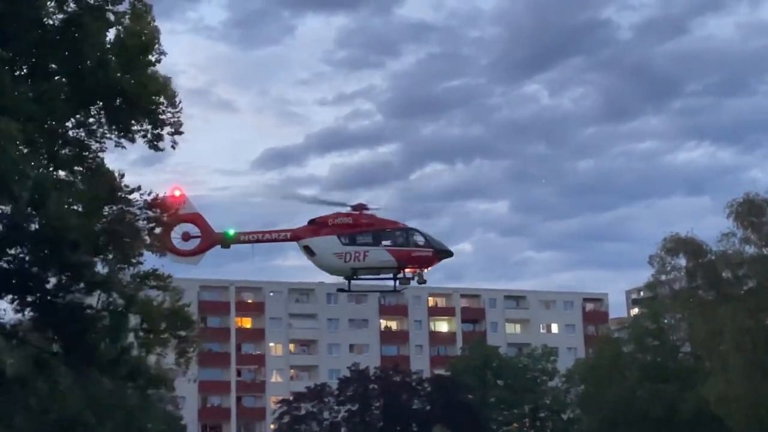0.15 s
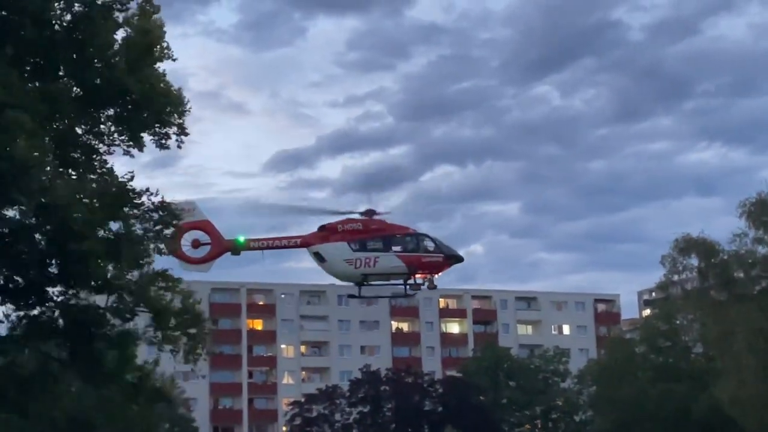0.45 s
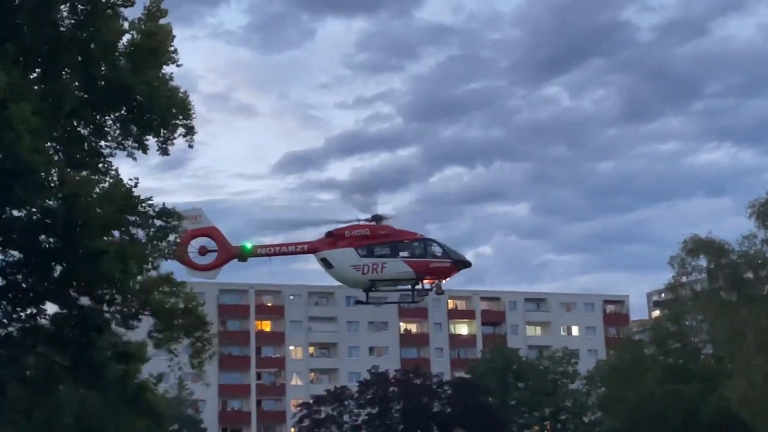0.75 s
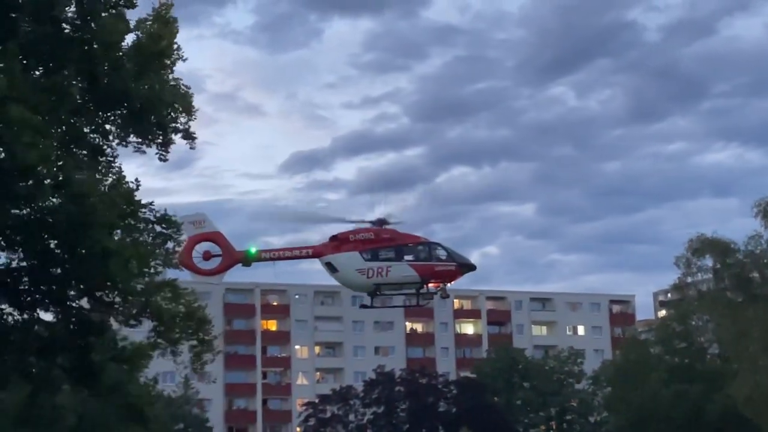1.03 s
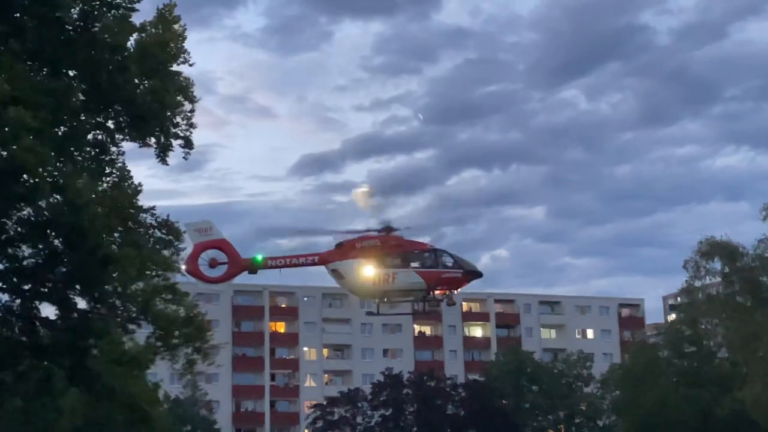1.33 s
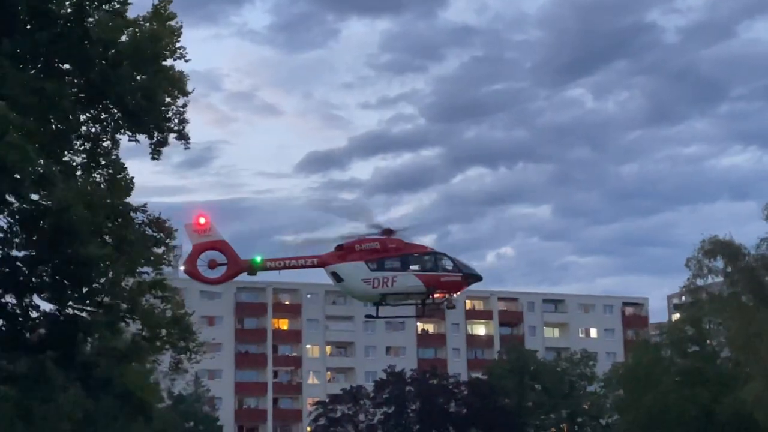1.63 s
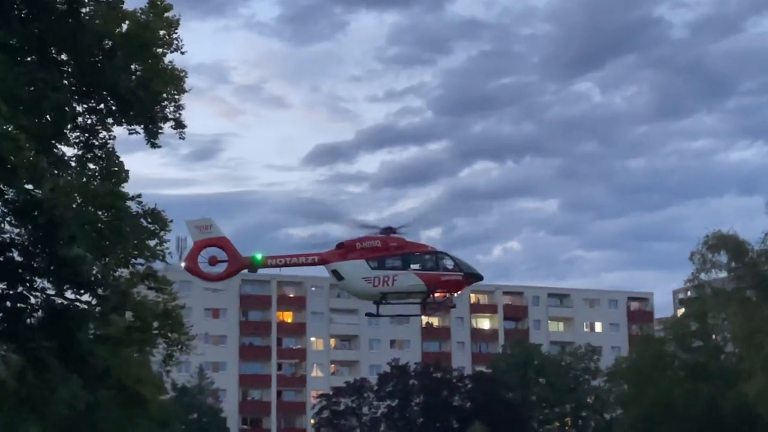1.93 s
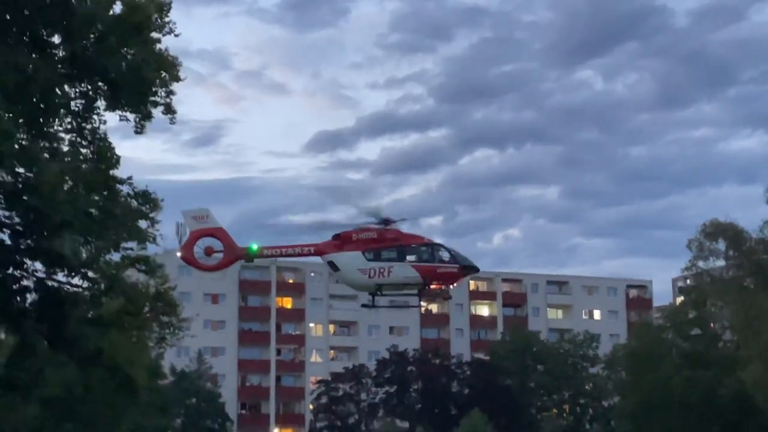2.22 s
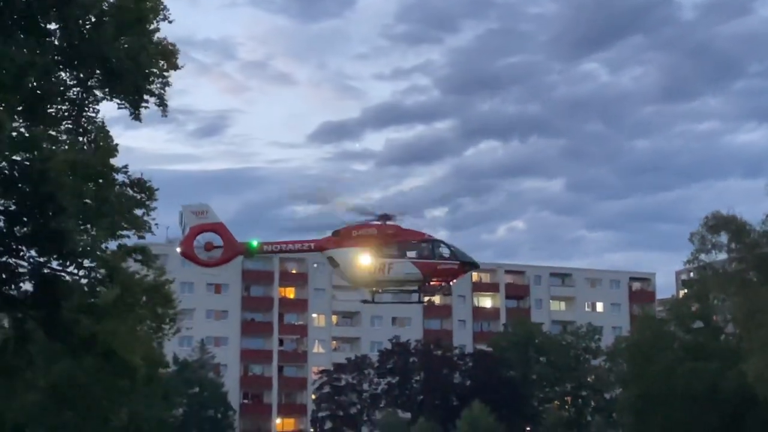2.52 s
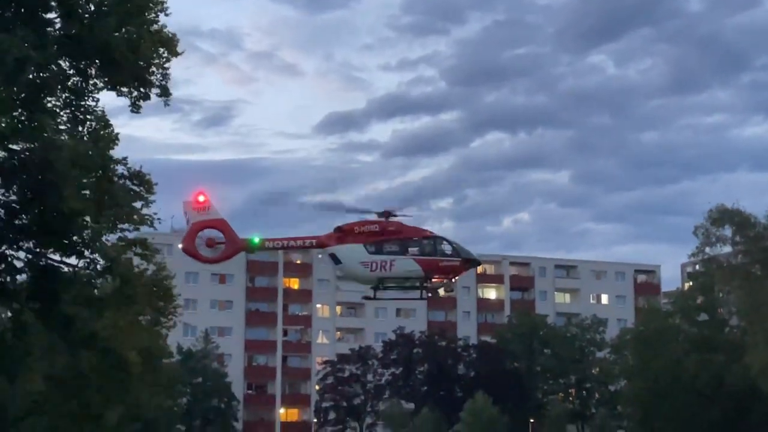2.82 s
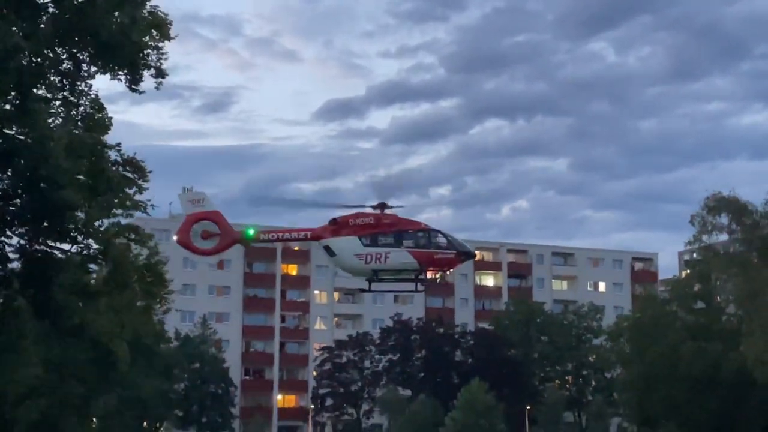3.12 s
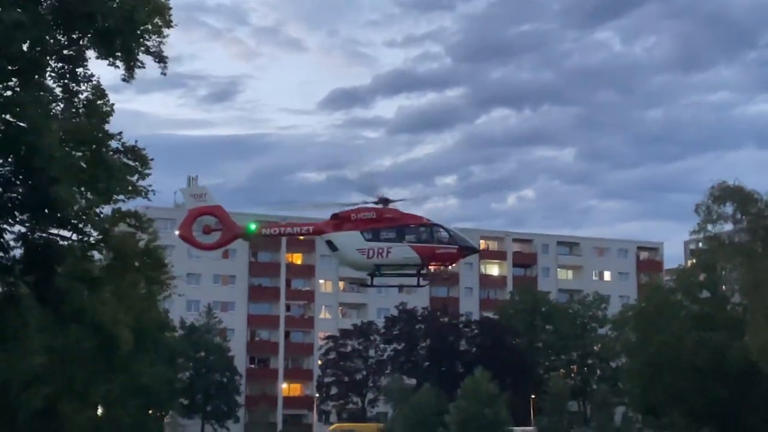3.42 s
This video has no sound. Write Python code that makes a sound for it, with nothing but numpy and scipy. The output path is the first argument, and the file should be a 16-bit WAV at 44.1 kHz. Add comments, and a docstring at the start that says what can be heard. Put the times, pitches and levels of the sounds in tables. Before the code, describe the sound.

Loud hovering helicopter with rapid hollow blade chop, whining tail fan and gusty low rumble

```python
"""Hovering helicopter

A helicopter hovers and sinks slowly over a park, in front of a block of flats.
Each blade cuts a few tip vortices in quick succession (the slap: coloured impulses), which ground and
house fronts echo. Sines at multiples of the blade rate make the rotor's low throb; filtered noise makes
blade swish and whistle, exhaust roar, turbine hiss, gear tones and rumbling downwash; the tail fan whines."""
import sys
import numpy as np
from scipy import signal
from scipy.fft import rfft, irfft, next_fast_len
from scipy.io import wavfile
from scipy.ndimage import uniform_filter1d, map_coordinates

SR = 44100
rng = np.random.default_rng(int(sys.argv[2]) if len(sys.argv) > 2 else 0)


def unload_wav(signal):
    """Save mono or channel-first audio to the path in sys.argv[1] as 16-bit WAV at rate SR, clipped to [-1, 1]."""
    wavfile.write(
        sys.argv[1],
        SR,
        np.round(np.clip(np.atleast_2d(signal).T, -1, 1) * 32767).astype(np.int16),
    )


N = 156996


def undb(db):
    """Level to amplitude: 20 dB is a factor of ten."""
    return 10 ** (np.asarray(db) / 20)


def unit(x):
    """Normalisation of power: scale to rms 1."""
    return x / np.sqrt(np.mean(x ** 2))


def curve(rows, at):
    """Linear interpolation between the rows of a table."""
    return np.interp(at, *np.array(rows, float).T)


def noise():
    """White noise: equal power at every frequency."""
    return rng.standard_normal(N)


def walk(rate):
    """Low-passed randomness: a smooth drift with spread near 1, from `rate` fresh values a second."""
    hold = max(int(SR / rate), 2)
    steps = np.repeat(rng.standard_normal(N // hold + 1), hold)
    return 1.3 * uniform_filter1d(uniform_filter1d(steps, hold), hold)[:N]


def colour(x, rows):
    """Minimum-phase filtering: a causal response through (frequency [Hz], level [dB]); rms 1."""
    size = next_fast_len(2 * N)
    size += size % 2
    hz, db = np.array(rows, float).T
    f = np.arange(size // 2 + 1) * SR / size
    response_db = np.interp(np.log(f + 1), np.log(hz), db)
    # folding the cepstrum onto positive time makes the filter causal
    cepstrum = irfft(np.log(undb(response_db)))
    cepstrum[1:size // 2] *= 2
    cepstrum[size // 2 + 1:] = 0
    return unit(irfft(rfft(x, size) * np.exp(rfft(cepstrum)))[:N])


def narrow(hz, width_hz):
    """Narrow-band noise: a tone that wavers, as only a small band of noise passes; rms 1."""
    f = np.arange(N // 2 + 1) * SR / N
    resonance = 1 / (1 + (2 * (f - hz) / width_hz) ** 2)
    return unit(irfft(rfft(noise()) * resonance, N))


def clicks(times, sizes):
    """Band-limited impulses: windowed sincs placed between the samples at exact times."""
    out = np.zeros(N)
    at = np.floor(times * SR).astype(int)[:, None] + np.arange(-7, 9)
    off = at - times[:, None] * SR
    inside = (at >= 0) * (at < N)
    pulses = sizes[:, None] * np.sinc(off) * np.sinc(off / 8) * inside
    np.add.at(out, np.clip(at, 0, N - 1), pulses)
    return out


def puffs(times, sizes, rise_ms, fall_ms):
    """Amplitude modulation: an envelope that swells and dies exponentially once for every blade."""
    ms = np.arange(-SR // 20, SR // 20 + 1) * 1000 / SR
    shape = np.exp(np.where(ms < 0, ms / rise_ms, -ms / fall_ms))
    return signal.fftconvolve(clicks(times, sizes), shape, "same")


def wide_noise(rows, side_db):
    """Partial coherence: coloured noise, nearly the same left and right."""
    mid, side = colour(noise(), rows), colour(noise(), rows)
    return mid + undb(side_db) * np.array([side, -side])


# blade passing rate: (time [s], rate [Hz])
BLADE_RATE = [(0, 25.943), (1.3, 25.88), (2.0, 25.85), (2.6, 25.79), (3.56, 25.806)]
FIRST_SLAP_S = .0321


def blade_turns(t):
    """Phase is the integral of frequency: blade passes counted from the first slap."""
    turns = np.cumsum(curve(BLADE_RATE, t)) / SR
    return turns - np.interp(FIRST_SLAP_S, t, turns)


# level of the slap's hollow knock, and of its sharp edge: (time [s], level [dB])
KNOCK_LEVEL = [(0, -25.5), (.3, -18), (.42, -22), (.5, -29.5), (.75, -22.5), (.92, -19.5), (1.08, -16.5),
               (1.3, -21), (1.57, -20.5), (1.72, -27), (1.9, -22), (2.17, -20), (2.55, -25), (3.2, -23.5),
               (3.56, -20)]
EDGE_LEVEL = [(0, -36.5), (.8, -32.5), (1.04, -29.5), (1.35, -29.5), (1.56, -30), (1.95, -34.5),
              (2.15, -27.5), (2.38, -26.5), (2.6, -31.5), (2.8, -28.5), (3.05, -31), (3.3, -26),
              (3.56, -31)]
# their spectra: (frequency [Hz], relative level [dB])
KNOCK_COLOUR = [(20, -40), (100, -40), (220, -11), (320, 0), (420, -3), (560, 0), (720, -8), (1000, -32.5),
                (2000, -42.5), (9000, -83)]
EDGE_COLOUR = [(30, -60), (350, -25), (650, -5), (820, 0), (1050, -4), (1320, 2), (1750, -15), (2300, -14),
               (3600, -19), (14000, -60)]
# blades that cut a vortex squarely, with a stronger edge: (time [s])
HARD_BLADES = [1.038, 1.578, 1.812, 1.850, 2.818, 2.935]
HARD_DB = 4
# strength of the successive strikes of one blade: (level [dB])
STRIKES = [-2.5, 0, -3.5, -10]
# time between the vortices that one blade meets: (time [s], gap [ms])
VORTEX_GAP = [(0, 2.67), (.33, 2.53), (.6, 2.12), (1.0, 2.32), (1.4, 1.91), (1.6, 2.39), (1.9, 2.35),
              (2.15, 2.155), (2.85, 2.1), (3.56, 2.11)]
# random scatter in strike times; the slap turns ragged for a while: (time [s], scatter [ms])
STRIKE_JITTER = [(2.3, .045), (2.7, .17), (3.2, .05)]
GAP_SCATTER = .03  # share of the gap, so that each slap has its own colour
BLADE_SCATTER_DB, STRIKE_SCATTER_DB = .8, 1.6  # from blade to blade, from strike to strike
VORTEX_WANDER_MS = .03


def blade_slap(t, passes):
    """Blade-vortex interaction: rows of impulses, whose closer spacing raises the pitch of the knock."""
    knock, edge = 0, 0
    gap_ms = curve(VORTEX_GAP, passes) * (1 + GAP_SCATTER * rng.standard_normal(len(passes)))
    hard_blades = [np.argmin(abs(passes - s)) for s in HARD_BLADES]
    hard = np.isin(np.arange(len(passes)), hard_blades)
    blade_db = BLADE_SCATTER_DB * rng.standard_normal(len(passes))
    for k, strike_db in enumerate(STRIKES):
        time_chance, size_chance = rng.standard_normal((2, len(passes)))
        wander_ms = VORTEX_WANDER_MS * np.interp(passes, t, walk(3.72))
        late_ms = k * gap_ms + curve(STRIKE_JITTER, passes) * time_chance + wander_ms
        times = passes + late_ms / 1000
        sizes = undb(strike_db + blade_db + STRIKE_SCATTER_DB * size_chance)
        knock = knock + clicks(times, sizes)
        edge = edge + clicks(times, sizes * undb(HARD_DB * hard))
    knock = colour(knock, KNOCK_COLOUR) * undb(curve(KNOCK_LEVEL, t))
    return knock + colour(edge, EDGE_COLOUR) * undb(curve(EDGE_LEVEL, t))


# ground and house fronts: (delay at the start [ms], drift [ms per s], level [dB])
ECHOES = [(5.985, 0.817, -8.5), (46.74, -1.434, -13.5)]
ECHO_TOP_HZ = 650
SCATTER_T60_S, SCATTER_DB = .4, -16


def surroundings(t, x):
    """Reflection and scattering: dull echoes slide as the machine sinks; trees add a decaying tail."""
    x = signal.sosfilt(signal.butter(3, ECHO_TOP_HZ, fs=SR, output="sos"), x)
    echoes = 0
    for delay_ms, drift, db in ECHOES:
        heard_from = t - (delay_ms + drift * t) / 1000
        echoes = echoes + undb(db) * map_coordinates(x, [heard_from * SR], order=1)
    tail = noise() * undb(-60 * t / SCATTER_T60_S)
    tail = tail / np.linalg.norm(tail)
    return echoes + undb(SCATTER_DB) * signal.fftconvolve(x, tail)[:N]


def partial(k, turns):
    """Harmonic of a periodic source: a sine at k times the blade rate, wavering a little."""
    phase = 2 * np.pi * (round(k) * turns + rng.random()) + .3 * walk(5)
    return np.sqrt(2) * undb(1.3 * walk(3)) * np.sin(phase)


# level of twice the blade rate: (time [s], level [dB])
THROB_LEVEL = [(0, -24), (.25, -27), (1.0, -31), (1.7, -30.5), (2.0, -56), (2.35, -49), (2.65, -32),
               (3.56, -30)]
# the thud above it: (multiple of the blade rate [1], relative level [dB])
THUD_PARTIALS = [(3, -8), (4, -7.5), (5, -3.5), (6, -1.5), (7, -3.5), (8, -11)]
# gain of all these multiples together: (time [s], level [dB])
THUD_LEVEL = [(0, -40), (.6, -38), (1.95, -34), (2.3, -30), (3.56, -29.5)]


def throb(t, turns):
    """Rotational noise: the rotor's periodic push on the air sounds at multiples of the blade rate."""
    thud = sum(undb(db) * partial(k, turns) for k, db in THUD_PARTIALS)
    return partial(2, turns) * undb(curve(THROB_LEVEL, t)) + thud * undb(curve(THUD_LEVEL, t))


# spectrum of the swish: (frequency [Hz], relative level [dB])
SWISH_COLOUR = [(150, -31.5), (420, -4), (800, 5.5), (1500, -3), (2400, -1.5), (6000, -18.5), (12000, -28)]
SWISH_DB, SWISH_AT_MS, SWISH_RISE_MS, SWISH_FALL_MS = -32, 1, .8, 4.5


def blade_swish(passes):
    """Broadband blade noise: a burst of filtered noise with each passing blade."""
    sizes = undb(2 * rng.standard_normal(len(passes)))
    gate = puffs(passes + SWISH_AT_MS / 1000, sizes, SWISH_RISE_MS, SWISH_FALL_MS)
    return undb(SWISH_DB) * colour(gate * noise(), SWISH_COLOUR)


WHISTLE_HZ, WHISTLE_WIDTH_HZ, WHISTLE_DB = 8930, 650, -42.5
WHISTLE_AT_MS, WHISTLE_MS = 14, 10  # delay after the blade; rise and fall time
WHISTLE_SCATTER_DB = 3


def blade_whistle(passes):
    """Modulated narrow-band noise: a short high whistle a little after each blade."""
    sizes = undb(WHISTLE_SCATTER_DB * rng.standard_normal(len(passes)))
    gate = puffs(passes + WHISTLE_AT_MS / 1000, sizes, WHISTLE_MS, WHISTLE_MS)
    whistle = gate * undb(3.7 * walk(6.83)) * narrow(WHISTLE_HZ, WHISTLE_WIDTH_HZ)
    return undb(WHISTLE_DB) * unit(whistle)


# spectrum of the roar: (frequency [Hz], relative level [dB])
ROAR_COLOUR = [(20, -45), (100, -14), (170, -10), (240, -10.5), (340, -2), (560, 0), (700, -7), (900, -8),
               (1100, -16), (1350, -15), (1800, -24), (14000, -70)]
ROAR_DB, ROAR_SIDE_DB = -23.5, -17  # side: the share that differs left and right


def exhaust_roar():
    """Jet noise: turbulent exhaust as broadband noise of gently drifting level."""
    return wide_noise(ROAR_COLOUR, ROAR_SIDE_DB) * undb(ROAR_DB + .85 * walk(5.96))


def shimmer(x, depth_db, rate, count=14):
    """Scintillation: moving air lets each band of a distant sound swell and fade on its own."""
    f = np.arange(N // 2 + 1) * SR / N
    place = np.interp(np.log(f + 1), np.log([1500, 14000]), [0, count - 1])
    spectrum = rfft(x)
    out = 0
    for k in range(count):
        band = irfft(spectrum * np.maximum(1 - abs(place - k), 0), N)  # overlapping triangles
        out = out + band * undb(depth_db * walk(rate))
    return out


# spectrum of the hiss: (frequency [Hz], relative level [dB])
HISS_COLOUR = [(60, -29), (600, -20.5), (1100, -6), (1550, -4), (1760, -5.5), (1950, 0.5), (2900, -2.5),
               (4000, -7), (5000, -10.5), (7400, -17.5), (9600, -13), (10400, -17.5), (12800, -27),
               (15500, -22)]
# mean level of the hiss: (time [s], level [dB])
HISS_LEVEL = [(0, -27), (.25, -30.5), (.55, -31), (.8, -29), (1.3, -30.8), (1.55, -29), (1.97, -31),
              (2.11, -27), (2.3, -29.8), (2.95, -28.4), (3.35, -31.3)]
# spectrum of hiss arriving from all round: (frequency [Hz], relative level [dB])
AROUND_COLOUR = [(900, -22), (1400, -10), (1720, 0), (2150, -15), (4500, -42), (7000, -29), (14000, -37)]
AROUND_DB = -43


def turbine_hiss(t):
    """Broadband flow noise: shimmering direct hiss, and a diffuse part of opposite sign left and right."""
    hiss = shimmer(colour(noise(), HISS_COLOUR), depth_db=1.4, rate=12)
    hiss = hiss * undb(curve(HISS_LEVEL, t) + walk(27.99))
    around = undb(AROUND_DB) * colour(noise(), AROUND_COLOUR)
    return hiss + np.array([around, -around])


FAN_HZ, FAN_DB = 631.6, -34.3


def tail_fan(t):
    """Tonal fan noise: a steady whine, as a sine drifting slightly in level and phase."""
    whine = np.sin(2 * np.pi * FAN_HZ * t + walk(2))
    return np.sqrt(2) * undb(FAN_DB + 2 * walk(3)) * whine


# gears and turbine: (frequency [Hz], width [Hz], level [dB])
TONES = [(1331, 1.7, -44.5), (10460, 350, -50)]


def gear_tones():
    """Machine tones: gears and turbine as narrow bands of noise."""
    return sum(undb(db) * narrow(hz, width_hz) for hz, width_hz, db in TONES)


# spectrum of the rumble: (frequency [Hz], relative level [dB])
WASH_COLOUR = [(18, -39), (35, -4.5), (55, -1.5), (72, 3), (110, 0), (170, -4), (260, -6), (600, -16.5),
               (4000, -101)]
# mean level of the rumble: (time [s], level [dB])
WASH_LEVEL = [(0, -34.5), (.55, -31.5), (.8, -22.5), (1.15, -22.5), (1.62, -20.5), (1.85, -24.5),
              (2.0, -40.5), (2.25, -25), (3.56, -33)]
WASH_SIDE_DB = -16  # the share that differs left and right
# thumps as gusts burst: (time [s], frequency [Hz], peak level [dB])
THUMPS = [(.901, 98, -17), (1.006, 82, -16), (1.523, 165, -10), (1.665, 105, -16)]
THUMP_CYCLES = 1.3  # from the peak of the envelope to 1/e


def downwash(t):
    """Turbulent pressure: gusts of low rumble, and bursts as short Gaussian wave packets."""
    thumps = 0
    for at, hz, db in THUMPS:
        cycles = (t - at) * hz
        envelope = undb(db) * np.exp(-(cycles / THUMP_CYCLES) ** 2)
        thumps = thumps + envelope * np.sin(2 * np.pi * (cycles + rng.random()))
    rumble = wide_noise(WASH_COLOUR, WASH_SIDE_DB)
    return thumps + rumble * undb(curve(WASH_LEVEL, t) + 1.25 * walk(29))


def scene():
    """Superposition: all sources add, and one blade rate times everything that the rotor does."""
    t = np.arange(N) / SR
    turns = blade_turns(t)
    passes = np.interp(np.arange(int(turns[-1]) + 1), turns, t)
    slap = blade_slap(t, passes)
    rotor = slap + surroundings(t, slap) + throb(t, turns) + blade_swish(passes) + blade_whistle(passes)
    engines = exhaust_roar() + turbine_hiss(t) + tail_fan(t) + gear_tones()
    return rotor + engines + downwash(t)


# phase between the two microphones: (frequency [Hz], left leads by [rad])
PORT_PHASE = [(20, 0), (700, .2), (1200, 0), (1500, -.6), (1780, 1.1), (2000, 0), (6100, 0), (6800, -.7),
              (7500, -1.9), (7900, -2.95), (8700, -3.85), (9600, -4.45), (11000, -6.2), (12400, -6.3),
              (13300, -7.9), (13950, -9.42)]
# level between them: (frequency [Hz], left minus right [dB])
PORT_BALANCE = [(150, 0), (700, 1.5), (1200, .3), (1420, 1.8), (1680, -5), (1930, 1), (2400, 0)]
LOW_CUT_HZ, TOP_HZ, CEILING = 20, 14300, 1.1


def record(dry):
    """Interchannel difference and saturation: microphones differ, peaks round off, both ends are cut."""
    f = np.arange(N // 2 + 1) * SR / N
    # each microphone takes half of the difference
    half = np.exp(.5j * curve(PORT_PHASE, f)) * undb(curve(PORT_BALANCE, f) / 2)
    pair = irfft(rfft(dry) * np.array([half, 1 / half]), N)
    pair = signal.sosfilt(signal.butter(2, LOW_CUT_HZ, "high", fs=SR, output="sos"), pair)
    pair = pair / (1 + (pair / CEILING) ** 6) ** (1 / 6)
    return signal.sosfilt(signal.ellip(10, .2, 80, TOP_HZ, fs=SR, output="sos"), pair)


dry = scene()
out = record(dry)
unload_wav(out)
```